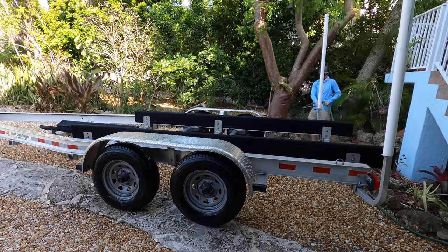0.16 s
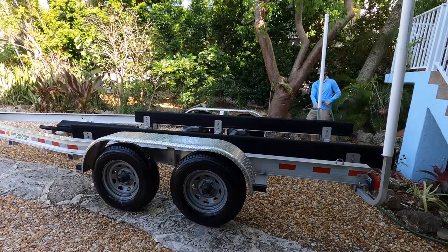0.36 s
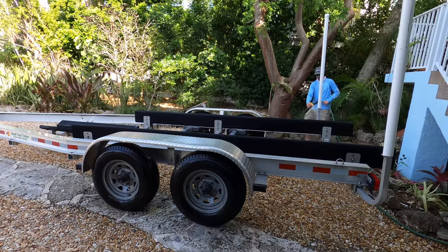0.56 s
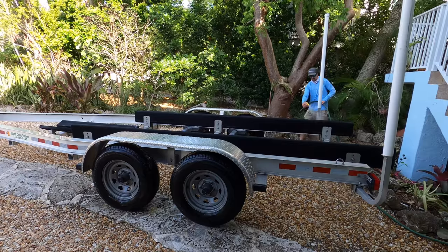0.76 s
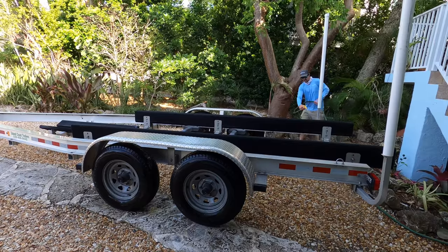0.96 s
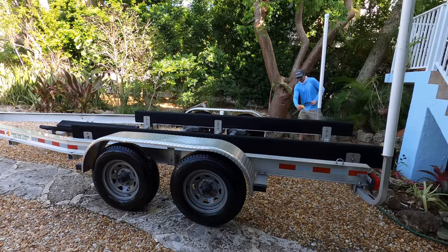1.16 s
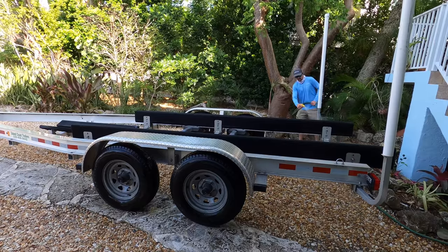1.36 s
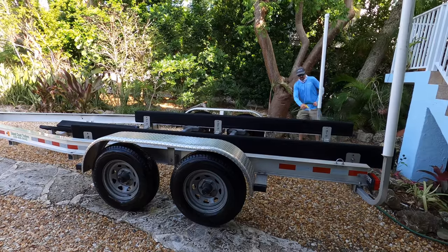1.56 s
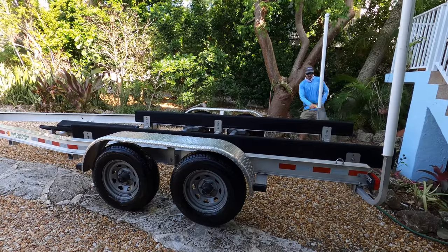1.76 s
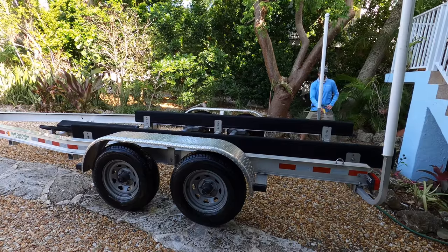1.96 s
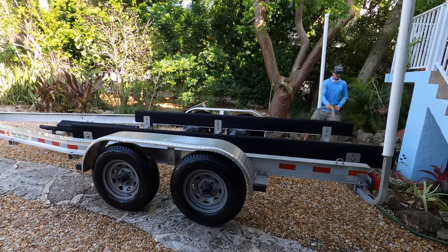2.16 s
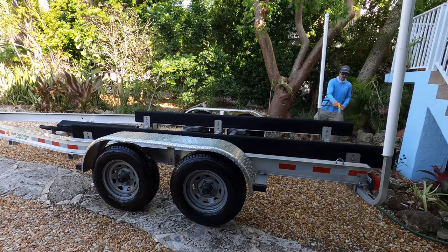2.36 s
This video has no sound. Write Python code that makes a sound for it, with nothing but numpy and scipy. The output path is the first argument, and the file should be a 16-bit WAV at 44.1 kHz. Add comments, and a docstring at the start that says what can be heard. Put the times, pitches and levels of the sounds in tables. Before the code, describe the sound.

A garden hose jet hisses steadily over a metal boat trailer, drops pattering and the nozzle giving brief high whistles; outdoors in a yard, faint hum, a distant dove, and wind thumping the microphone mid-way.

```python
"""A water jet hisses and whistles on and off; fine drops patter on metal and gravel in a yard.
Parts of a boat trailer's frame ring briefly, a far machine hums, a distant dove coos and gusts rumble.
The jet, the ringing parts and the yard are filtered noise, the drops are tiny impulses, and the hum,
coos, whistle tone and low wind pulses are sine oscillations of varying pitch and level."""
import sys
import numpy as np
from scipy import signal
from scipy.fft import rfft, irfft
from scipy.io import wavfile
from scipy.ndimage import uniform_filter1d

SR = 44100
rng = np.random.default_rng(int(sys.argv[2]) if len(sys.argv) > 2 else 0)


def wav_record(signal):
    """Record a signal, one row per channel, as 16-bit PCM in the file named by sys.argv[1]."""
    frames = np.transpose(np.atleast_2d(signal))
    bounded = np.clip(frames, -1, 1)
    # unit amplitude maps onto the largest positive 16-bit level
    quanta = np.round(bounded * 32767).astype(np.int16)
    wavfile.write(sys.argv[1], SR, quanta)


N = 110250
T = np.arange(N) / SR
HZ = np.maximum(np.fft.rfftfreq(N, 1 / SR), 1)
PATCHY_HZ = 8  # corner rate of the flicker in each band


def from_db(db):
    """Level and amplitude: 20 dB is a factor of ten in amplitude."""
    return 10 ** (np.asarray(db) / 20)


def rms_one(x):
    """Normalisation: divide by the root of the mean power."""
    return x / np.sqrt(np.mean(x ** 2) + 1e-20)


def level(rows):
    """Amplitude envelope: time and dB points joined by straight lines in dB."""
    return from_db(np.interp(T, *np.transpose(rows)))


def colour(x, spectrum):
    """Spectral shaping: weight each frequency along a curve drawn on a log-frequency axis; rms 1."""
    hz, db = np.transpose(spectrum)
    gain = from_db(np.interp(np.log(HZ), np.log(hz), db))
    return rms_one(irfft(rfft(x) * gain, N))


def drift(corner_hz):
    """Slow fluctuation: noise low-passed above a corner rate; rms 1."""
    noise = rfft(rng.standard_normal(N))
    return rms_one(irfft(noise / (1 + (HZ / corner_hz) ** 2), N))


def resonance(hz, width_hz):
    """Resonance: noise passed twice through one resonant magnitude response; rms 1."""
    noise = rfft(rng.standard_normal(N))
    return rms_one(irfft(noise / (1 + (2 * (HZ - hz) / width_hz) ** 2), N))


def wavering(hz, wander, rate_hz):
    """Frequency modulation: a sine whose log frequency drifts by an rms of wander; rms about 1."""
    frequency = hz * np.exp(wander * drift(rate_hz))
    turns = rng.random() + np.cumsum(frequency) / SR
    return np.sqrt(2) * np.sin(2 * np.pi * turns)


def steadied(x, window_s):
    """Envelope compression: divide a noise by its own short-term amplitude; rms 1."""
    envelope_power = np.abs(signal.hilbert(x)) ** 2
    power = uniform_filter1d(envelope_power, max(1, int(window_s * SR)))
    return rms_one(x / np.sqrt(power + 0.0011))


def patchy(x, patchy_db):
    """Independent modulation: each third-octave band flickers by an rms of patchy_db."""
    whole = rfft(x)
    # all below 200 Hz shares the lowest band, all above 16 kHz the highest
    band = np.round(3 * np.log2(np.clip(HZ, 200, 16000)))
    out = np.zeros(N)
    for k in np.unique(band):
        out += irfft(whole * (band == k), N) * from_db(patchy_db * drift(PATCHY_HZ))
    return out


def yard():
    """Superposition: wavering machine tones add to broadband noise of falling spectrum."""
    # background spectrum: frequency_hz, relative_db_per_hz
    yard_spectrum = [(60, 6.5), (110, -1.5), (150, -5), (240, -2), (330, -2.5), (480, 0.5), (680, -2),
                     (1100, -4.5), (1500, -12.5), (3000, -23)]
    # tones of the far machine: frequency_hz, level_db
    hum_tones = [(147.5, -65.5), (166, -65.5), (214, -65.5), (220, -64), (276.5, -73), (360.5, -79),
                 (441.5, -71.5), (657, -68), (1180, -73), (1239, -78)]
    hum_waver_db, hum_wander = 0.5, 0.0025  # rms
    hum = np.zeros(N)
    for hz, db in hum_tones:
        gain = from_db(db + hum_waver_db * drift(1.4))
        hum += gain * wavering(hz, hum_wander, 7.4)
    background = colour(patchy(rng.standard_normal(N), 1.5), yard_spectrum)
    return hum + from_db(-51.5) * background


def dove():
    """Gliding pure tone: phase is the running sum of a pitch that bends within each coo."""
    # coos: start_s, length_s, first_hz, middle_hz, last_hz, level_db
    coos = [(0.182, 0.237, 447.7, 511, 518, -56.5), (0.437, 0.19, 497, 503, 500, -61),
            (0.826, 0.092, 616, 600, 605, -58.5), (0.847, .19, 739, 741, 768, -60),
            (0.965, 0.33, 494.7, 495, 497, -60)]
    edge_s, waver_db = 0.026, 0.2
    out = np.zeros(N)
    for s, length, first_hz, middle_hz, last_hz, db in coos:
        pitch = np.interp(T, [s, s + length / 2, s + length], [first_hz, middle_hz, last_hz])
        tone = rms_one(np.sin(2 * np.pi * np.cumsum(pitch) / SR))
        soft_edges = np.clip(np.minimum(T - s, s + length - T) / edge_s, 0, 1)
        out += from_db(db + waver_db * drift(15)) * soft_edges * tone
    return out


def wind():
    """Turbulent pressure on a microphone: slow swells, low buffeting and fine turbulent noise."""
    # gust envelope, before each layer's own gain: time_s, level_db
    gust_envelope = [(0, -57), (.12, -60), (.26, -49), (.37, -62), (.52, -51), (.59, -53), (.635, -40),
                     (.70, -37), (.775, -28), (.885, -29), (.94, -34), (.99, -35.5), (1.04, -37.5),
                     (1.16, -34.5), (1.22, -47), (1.29, -37), (1.35, -50), (1.48, -60), (1.55, -48),
                     (1.66, -41), (1.81, -74), (1.87, -40), (1.96, -48), (2.03, -45), (2.1, -45),
                     (2.19, -73), (2.5, -50)]
    # fine turbulence: frequency_hz, relative_db_per_hz
    wind_spectrum = [(20, -11.5), (45, -3), (60, 0.5), (85, -12), (140, -9), (200, -16), (300, -26),
                     (1000, -71)]
    # slow pressure swells, before their filter and gain: time_s, level_db
    swell_envelope = [(0, -31), (.17, -33.5), (.27, -19.5), (.43, -30), (.56, -31.5), (.68, -18), (.9, -18),
                      (1.02, -21.5), (1.21, -14.5), (1.34, -34.5), (1.5, -34), (1.68, -22.5), (1.88, -25.5),
                      (2.12, -24), (2.38, -37)]
    buffet_hz, buffet_wander, buffet_rate_hz, buffet_db = 27, 0.2167, 11.2, 4.5
    turbulence_db, gust_share = -26.5, 0.77  # share of the gusts' dB swing
    swell_hz, swell_wander, swell_rate_hz, swell_db = 7.5, 0.301, 5.87, -1
    swell_top_hz = 17

    gust = level(gust_envelope)
    buffet = gust * wavering(buffet_hz, buffet_wander, buffet_rate_hz)
    fine_noise = steadied(colour(rng.standard_normal(N), wind_spectrum), 0.017)
    turbulence = gust ** gust_share * fine_noise
    swell = level(swell_envelope) * wavering(swell_hz, swell_wander, swell_rate_hz)
    swell = irfft(rfft(swell) / (1 + (HZ / swell_top_hz) ** 6), N)
    return from_db(buffet_db) * buffet + from_db(turbulence_db) * turbulence + from_db(swell_db) * swell


def puffs():
    """Pressure pulses of small eddies: low oscillations under bell-shaped envelopes thud softly."""
    # puffs, length between the 1/e points: middle_s, length_s, frequency_hz, peak_level_db
    puff_events = [(0.42, 0.072, 62, -53), (0.675, 0.033, 62, -61), (0.813, 0.041, 56, -43),
                   (0.916, 0.037, 68, -38.5), (1.127, 0.042, 57, -42.5), (1.557, 0.033, 58.4, -56),
                   (1.875, 0.032, 85, -49.5), (1.927, 0.068, 90, -52)]
    out = np.zeros(N)
    for s, length, hz, db in puff_events:
        bell = np.exp(-(2 * (T - s) / length) ** 2)
        out += from_db(db) * bell * wavering(hz, 0.14, 30)
    return out


def splashes():
    """Excited resonance: a band of noise swells and fades as the jet sweeps over a trailer part."""
    # crossings, length between the 1/e points: middle_s, length_s, frequency_hz, width_hz, peak_level_db
    crossings = [(0.474, 0.15, 5400, 400, -59.5), (0.484, 0.058, 2300, 200, -59),
                 (0.769, 0.039, 1594, 132, -52), (1.243, 0.14, 4360, 240, -59),
                 (1.498, .08, 3880, 700, -57.5), (2.151, 0.016, 1870, 400, -53)]
    out = np.zeros(N)
    for s, length, hz, width, db in crossings:
        bell = np.exp(-(2 * (T - s) / length) ** 2)
        out += from_db(db) * bell * resonance(hz, width)
    return out


def whistle():
    """Nozzle whistle: a thin tone and rough overblown resonances start fast, hold and decay."""
    # bursts, upper resonances relative to the burst: start_s, length_s, level_db, upper_db
    bursts = [(0, .025, -57, 5), (0.04, 0.028, -51, -6), (0.095, .012, -60.5, 11), (0.139, 0.027, -52.5, 3),
              (0.54, 0.014, -49.5, -8), (0.587, 0.043, -53, 2.5), (0.68, 0.014, -53.5, -2),
              (0.764, .03, -60.5, -10), (1.02, .025, -62, -10), (1.306, .035, -53, -13),
              (1.57, 0.12, -60, 2), (1.71, 0.11, -58.5, 2), (1.87, 0.055, -61, -10)]
    # overblown resonances: frequency_hz, width_hz, relative_db
    upper_modes = [(6250, 110, -5), (6550, 540, -9)]
    tone_hz, tone_wander, wander_rate_hz = 6020, 0.0022, 73
    flutter_db, flutter_rate_hz = 2, 70
    attack_s, decay_s = 0.0049, 0.029  # decay to 1/e

    tone_gain, upper_gain = np.zeros(N), np.zeros(N)
    for s, length, db, upper_db in bursts:
        attack = np.clip((T - s) / attack_s, 0, 1)
        decay = np.exp(-np.maximum(T - s - length, 0) / decay_s)
        burst = from_db(db) * attack * decay
        # where bursts overlap the stronger one counts
        tone_gain = np.maximum(tone_gain, burst)
        upper_gain = np.maximum(upper_gain, burst * from_db(upper_db))
    flutter = from_db(flutter_db * drift(flutter_rate_hz))
    tone = wavering(tone_hz, tone_wander, wander_rate_hz) * flutter
    upper = np.zeros(N)
    for hz, width, db in upper_modes:
        upper += from_db(db) * steadied(resonance(hz, width), 0.018)
    return tone_gain * tone + upper_gain * upper


def drops(count=14):
    """Random impacts: sparse impulses of uneven size, each a tick in one of the frequency bands."""
    drops_per_s, spread_db = 2500, 2.5
    sizes = from_db(spread_db * np.minimum(rng.exponential(1, N), 5))
    sizes = sizes * rng.choice([-1, 1], N)
    hits = sizes * (rng.random(N) < drops_per_s / SR)
    dealt = rng.integers(0, count, N)  # the band each drop falls in
    edges = np.geomspace(700, 16000, count + 2)  # Hz; neighbouring bands overlap
    out = np.zeros(N)
    for k in range(count):
        band = signal.butter(1, [edges[k], edges[k + 2]], "band", fs=SR, output="sos")
        # the tiny offset keeps the filter clear of vanishingly small numbers
        out += signal.sosfilt(band, hits * (dealt == k) + 1e-18)
    return out


def spray():
    """Jet turbulence: broadband hiss and drop impacts share one spectrum and one flow envelope."""
    # spray spectrum: frequency_hz, relative_db_per_hz
    spray_spectrum = [(300, -1.5), (900, 0.5), (2000, 1.5), (3200, 0), (4900, -1.5), (7000, -1),
                      (8600, 1.4), (9200, -2), (10000, -6.5), (11200, -9), (12600, -6), (14200, -5.5),
                      (15600, -13)]
    # flow envelope, before the spray's gain: time_s, level_db
    flow_envelope = [(0, -51.5), (.08, -54), (.22, -54), (.44, -52.5), (.53, -52.5), (.63, -52),
                     (.74, -52.7), (1.1, -53), (1.45, -53), (1.72, -52.5), (1.84, -53.5), (2.0, -52.5),
                     (2.16, -52.5), (2.34, -53.5), (2.5, -53)]
    spray_gain_db, drops_against_hiss_db = 4, -8
    hiss = colour(patchy(rng.standard_normal(N), 1), spray_spectrum)
    patter = from_db(drops_against_hiss_db) * colour(drops(), spray_spectrum)
    return level(flow_envelope) * from_db(spray_gain_db) * rms_one(hiss + patter)


def scene():
    """Superposition: the pressures of all sources add at one microphone."""
    background = yard() + dove() + wind() + puffs()
    jet = splashes() + whistle() + spray()
    return (background + jet)[None]


def record(dry):
    """Band limiting: a steep elliptic low-pass removes the top of the spectrum."""
    cutoff_hz = 15800
    low_pass = signal.ellip(12, .1, 90, cutoff_hz, fs=SR, output="sos")  # ripple, stopband in dB
    return signal.sosfilt(low_pass, dry)


dry = scene()
out = record(dry)
wav_record(out)
```